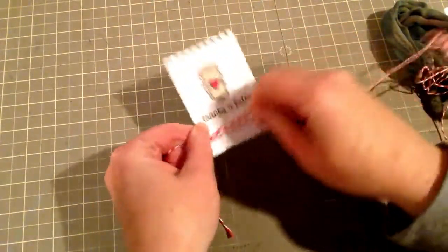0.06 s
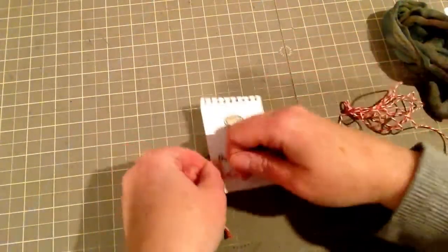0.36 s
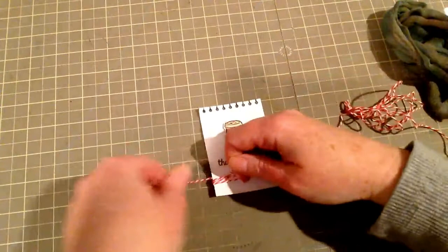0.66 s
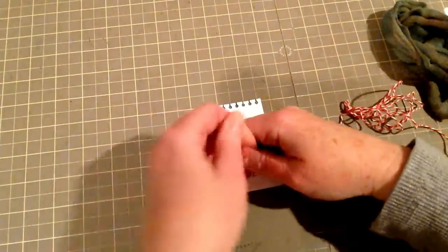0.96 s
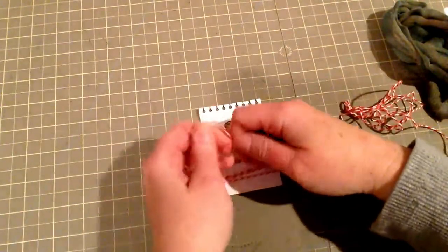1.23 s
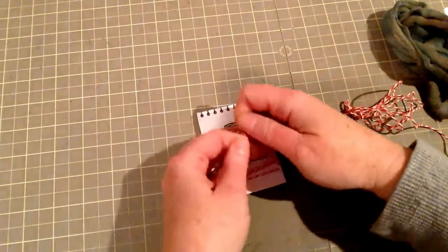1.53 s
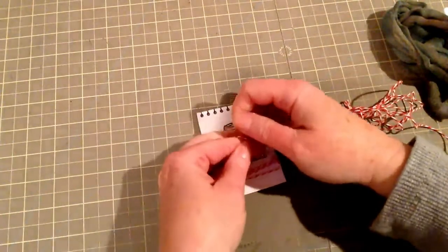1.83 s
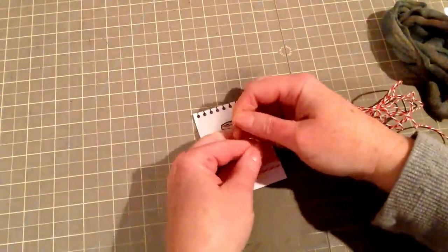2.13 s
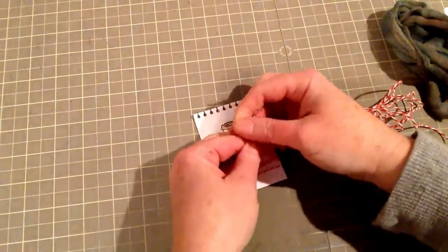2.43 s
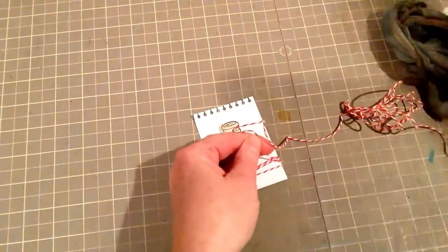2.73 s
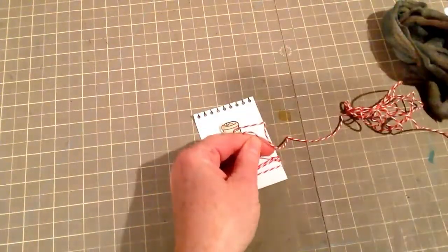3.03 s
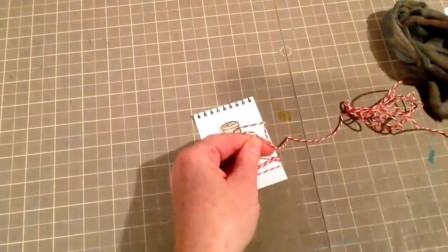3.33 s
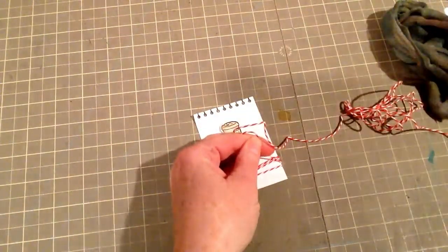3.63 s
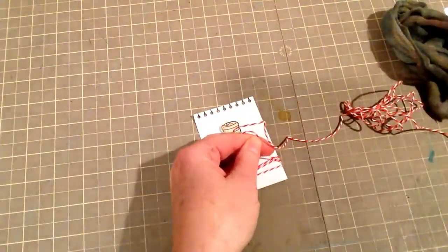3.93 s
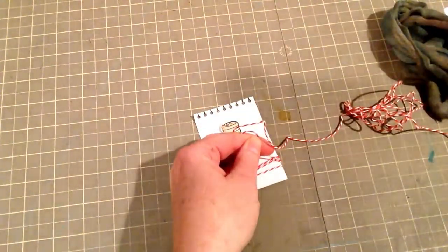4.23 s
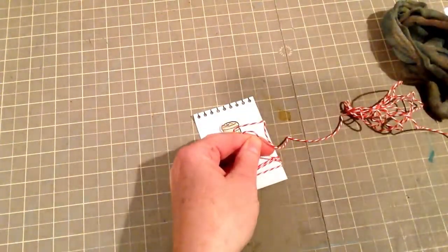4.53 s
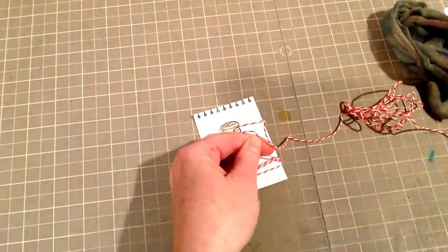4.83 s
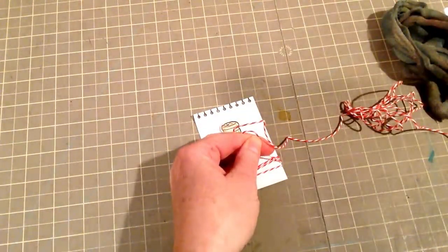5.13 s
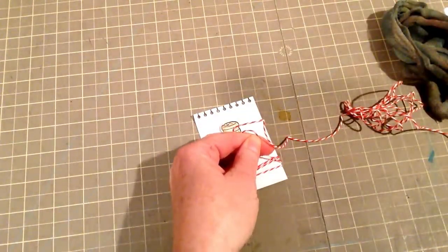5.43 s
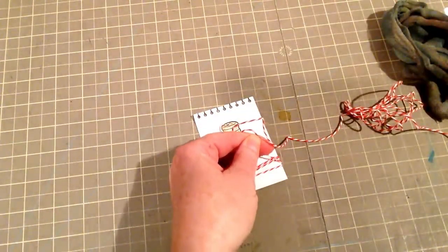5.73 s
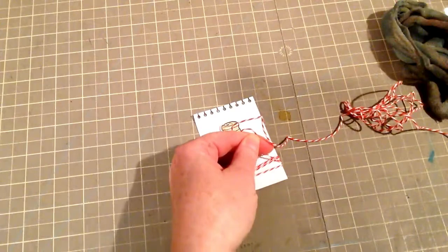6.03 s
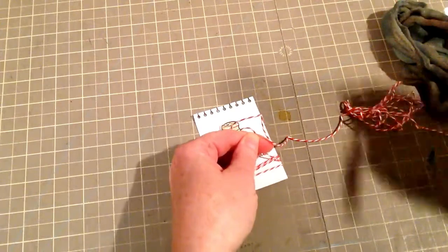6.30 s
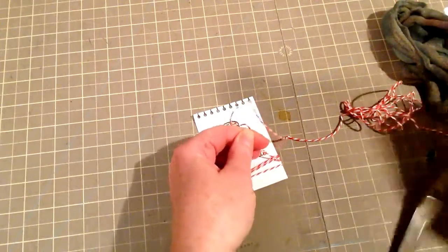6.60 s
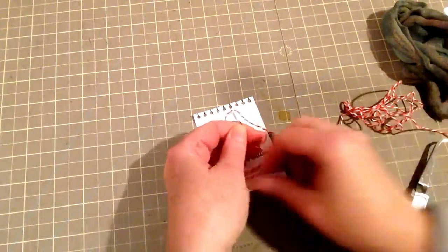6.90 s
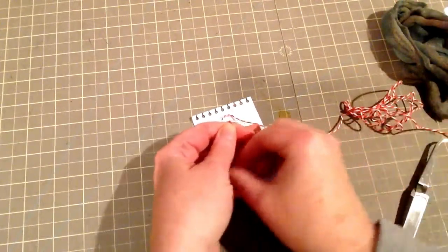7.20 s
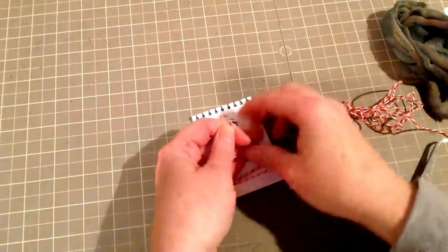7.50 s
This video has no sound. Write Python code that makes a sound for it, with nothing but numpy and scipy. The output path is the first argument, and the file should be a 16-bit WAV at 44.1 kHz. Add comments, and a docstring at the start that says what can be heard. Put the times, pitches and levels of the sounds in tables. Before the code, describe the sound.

Twine swishes faintly around a small paper card, and the card snaps once. Things knock and scrape on the desk, then tools rattle and drag in a hollow holder. Steel scissors are put down with two sharp clacks, the loudest sounds, before fingertips brush twine and paper again. The microphone is close, in a small dry room with a soft steady hiss.

```python
"""Twine swishes round the edge of a small paper card, wound by hand over a cutting mat. The card snaps
once and rings faintly under the taut twine. A sleeve rustles as one hand reaches aside, shifts things on
the desk, rummages in a hollow tool holder and puts scissors down with two steel clacks. Then fingertips
rub twine and paper again and the hand bumps the mat. Rubbing is a stream of tiny slips; knocks ring each
object's modes. One mono microphone, close to the hands, in a small dry room with a steady hiss."""
import sys
import numpy as np
from scipy import signal
from scipy.fft import rfft, irfft, next_fast_len
from scipy.io import wavfile

SR = 44100
rng = np.random.default_rng(int(sys.argv[2]) if len(sys.argv) > 2 else 0)


def pcm_store(signal):
    """Save signal as 16-bit PCM."""
    levels = np.round(np.clip(np.atleast_2d(signal), -1, 1) * 32767)
    wavfile.write(sys.argv[1], SR, levels.astype(np.int16).T)


N = 333416
TIME = np.arange(N) / SR

# Modes of the paper card: pitch_hz, level_db, t60_s
CARD_MODES = [(1617, -3.5, 0.016), (2030, -19.5, 0.0039), (2850, -16, 0.0048), (4140, -6, 0.003)]


def from_db(db):
    """Decibels to gain."""
    return 10 ** (np.asarray(db) / 20)


def rms_one(x):
    """Scale to rms 1."""
    return x / np.sqrt(np.mean(x ** 2) + 1e-20)


def butter(x, hz, kind, order=2):
    """Causal low-, high- or band-pass."""
    return signal.sosfilt(signal.butter(order, hz, kind, fs=SR, output="sos"), x)


def coloured(x, colour):
    """Give a steady sound a spectrum; rms 1."""
    hz, db = np.transpose(colour)
    size = next_fast_len(N)
    bins_hz = np.maximum(np.fft.rfftfreq(size, 1 / SR), 1)
    gain = from_db(np.interp(np.log(bins_hz), np.log(hz), db))
    return rms_one(irfft(rfft(x, size) * gain, size)[:N])


def dying(t, t60):
    """Envelope that falls 60 dB in t60 seconds."""
    return np.exp(-np.log(1000) * t / t60)


def ringing(modes):
    """Damped sines after a touch; where it lands sets their strength and sign, the grip their pitch."""
    t = TIME[:SR // 5]
    chance = rng.standard_normal((len(modes), 3))
    strengths = from_db(2 * chance[:, 0]) * np.sign(chance[:, 1])
    detunes = 1 + .015 * chance[:, 2]
    return sum(strength * from_db(db) * np.sin(2 * np.pi * hz * detune * t) * dying(t, t60)
               for strength, detune, (hz, db, t60) in zip(strengths, detunes, modes))


def friction(slips_per_s, spread_db, smooth, judder_db):
    """Tiny random slips of uneven size over a smooth hiss, under a pressure that wavers; rms 1."""
    slips = (rng.random(N) < slips_per_s / SR) * rng.choice([-1, 1], N)
    sizes = from_db(spread_db * np.minimum(rng.exponential(1, N), 4))
    pressure = rms_one(butter(rng.standard_normal(N), 55, "low"))
    texture = rms_one(slips * sizes) + smooth * rng.standard_normal(N)
    return rms_one(texture * from_db(judder_db * pressure))


def rubbed(slips, modes):
    """Slips keep an object's modes ringing; rms 1."""
    return rms_one(signal.fftconvolve(slips, ringing(modes))[:N])


def strokes(table, attack_s, release_s):
    """Gain of a row of strokes: each takes hold, swells or eases with the pressure, and dies away."""
    power = np.zeros(N)
    for start, length, halfway_db, swell_db in table:
        during = slice(*np.searchsorted(TIME, [start, start + length + release_s]))
        t = TIME[during] - start
        attack = np.clip(t / attack_s, 0, 1)
        hold = from_db(halfway_db + swell_db * (np.clip(t / length, 0, 1) - .5))
        release = dying(np.maximum(t - length, 0), release_s)
        power[during] += (attack * hold * release) ** 2
    return np.sqrt(power)


def blows(table, modes, crack_db, crack_t60, spread, body_db, treble_db, clack_hz):
    """Each blow is a tick, a crack and a ring; harder contact has less body, more treble, a higher clack.
    body_db and treble_db (relative to the clack) and clack_hz hold at hardness 0; the hardest is 1."""
    out = np.zeros(N + SR)
    attack = round(.006 * SR)   # each band's level is set over its first 6 ms
    for start, level_db, hardness in table:
        centre_hz = clack_hz * 2 ** hardness
        shares_db = body_db - 28 * hardness, 0, treble_db + 25.5 * hardness
        ring = ringing(modes)
        crack = rng.standard_normal(len(ring)) * dying(TIME[:len(ring)], crack_t60)
        crack[0] = 6   # the tick of contact
        blow = ring + from_db(crack_db) * crack
        body = butter(blow, [100, 850], "band", order=5)
        clack = butter(blow, [centre_hz / spread, centre_hz * spread], "band", order=3)
        treble = butter(blow, 5000, "high", order=3)
        at = round(start * SR)
        for part, db in zip((body, clack, treble), shares_db):
            out[at:at + len(part)] += from_db(level_db + db) * part / np.sqrt(np.mean(part[:attack] ** 2))
    return out[:N]


def twine(fibres):
    """Twine swishes round the edge of the card; pulled taut, it rasps and the card rings."""
    # Pulls round the edge: start_s, length_s, level_db, swell_db
    pulls = [(.03, 0.061, -50.5, 5), (.11, 0.14, -59, 2), (.205, 0.19, -50, 2.5)]
    # Taut tugs: start_s, length_s, level_db, swell_db
    tugs = [(.93, 0.025, -52, 1), (1.0, 0.484, -66.5, -6)]
    # Spectrum of the swish: freq_hz, level_db
    colour = [(900, -18), (1600, -9), (2150, -3.5), (2650, -4.5), (3100, -5.5), (4200, 1), (5700, -9.5),
              (7400, -8.5), (8000, -7), (8600, -5), (9800, -11.5), (13300, -15), (14200, -40)]
    swish = strokes(pulls, attack_s=0.022, release_s=0.13) * coloured(fibres, colour)
    rasp = strokes(tugs, attack_s=0.023, release_s=0.15) * rubbed(fibres, CARD_MODES)
    return swish + rasp


def card_snaps():
    """The edge of the card flicks: one clear snap and two faint ones."""
    # Flicks: start_s, level_db, hardness
    flicks = [(.576, -51, 0.67), (.793, -22, 0.085), (7.062, -51, 0.82)]
    return blows(flicks, CARD_MODES, crack_db=-8, crack_t60=0.035, spread=1.86,
                 body_db=-14.5, treble_db=-41, clack_hz=1720)


def mat_taps():
    """Light things touch the cutting mat, most with a dull tap."""
    # Touches: start_s, level_db, hardness
    touches = [(.611, -56, 0.52), (1.757, -51, 0.23), (2.03, -53, 0.31), (2.586, -42.5, 0.21),
               (3.1005, -21.5, 0.8), (3.323, -44.5, .03), (3.391, -46.5, 0.12), (3.418, -53.5, 0.14),
               (3.441, -47.5, 0.29), (7.183, -45, 1)]
    # Modes of the mat: pitch_hz, level_db, t60_s
    modes = [(277, -5.5, 0.036), (397, -4, 0.049), (537, -5.5, 0.048), (1380, 0.5, 0.022)]
    taps = blows(touches, modes, crack_db=9.5, crack_t60=0.031, spread=1.84,
                 body_db=14.5, treble_db=-25, clack_hz=1296)
    return butter(taps, 374, "high")   # light things give the mat little bass


def sleeve():
    """Cloth rustles low as the arm moves."""
    # Arm movements: start_s, length_s, level_db, swell_db
    moves = [(.75, 0.93, -67.5, 1.8), (2.15, 1.38, -57.5, -0.47), (5.7, 1.5, -72.5, -2)]
    # Spectrum of the cloth: freq_hz, level_db
    colour = [(80, -22.5), (130, -4.5), (220, -0.5), (400, -8.5), (1500, -31.5), (6000, -66)]
    return strokes(moves, attack_s=0.24, release_s=1.56) * coloured(rng.standard_normal(N), colour)


def fingertips(fibres):
    """Fingertips slip over twine and paper with a bright brushing."""
    # Rubs: start_s, length_s, level_db, swell_db
    rubs = [(.82, 0.17, -62.5, 9), (1.135, 0.027, -59.5, 5), (1.405, 0.037, -55, 5), (1.63, .04, -56, -4),
            (2.91, 0.177, -48, 1.5), (3.375, 0.016, -43.5, 10.5), (7.07, 0.15, -53.5, 2.5),
            (7.26, 0.13, -48, -1), (7.465, 0.11, -42.5, 9.5)]
    # Spectrum of the brushing: freq_hz, level_db
    colour = [(500, -19.5), (1400, -8), (2900, -8), (4000, -0.5), (5800, 1), (8000, -3), (13300, -6),
              (14200, -52)]
    return strokes(rubs, attack_s=0.015, release_s=0.08) * coloured(fibres, colour)


def tool_holder():
    """Tools knock and drag in the holder; the same slips make the grit and excite its hollow ring."""
    # Tools knocking about: start_s, relative_level_db, hardness
    hits = [(2.43, -48, 0.2), (2.466, -21, 0.84), (2.494, -27, 0.69), (4.142, -59, 0.02),
            (4.528, -30.5, 0.84), (4.569, -40, 1), (4.578, -24.5, 1), (4.5875, -25, 0.7),
            (4.6015, -23.5, .85), (4.731, -39, 0), (4.9405, -24.5, 0.31), (5.089, -44, 0.01),
            (5.124, -43, 0.86), (5.132, -47.5, 0.14), (5.144, -45, 0.9), (5.2445, -37.5, 1),
            (5.413, -43.5, 0), (5.475, -35, 0.42)]
    # Drags along the holder's wall: start_s, length_s, relative_level_db, swell_db
    drags = [(2.458, 0.041, -29, 4), (3.76, 0.16, -66.5, -9), (4.517, 0.022, -38, 9),
             (4.572, 0.047, -38, -5), (4.883, 0.021, -46, -2.5), (4.955, 0.046, -35, 3.5),
             (5.09, .1, -50.5, 5.5), (5.2, 0.137, -39.5, 16.5), (5.35, .115, -36.5, -1),
             (5.475, 0.032, -30, -13)]
    # Modes of the holder: pitch_hz, level_db, t60_s
    modes = [(450, -7.5, 0.084), (501.6, 2, 0.039), (609, -3.5, 0.048), (690, 0.5, 0.019),
             (1201, -8.5, 0.023), (1562, -10, 0.036), (2440, -16, 0.0095), (3524, -1.5, 0.0089),
             (4690, -18.5, 0.024), (6050, -10, 0.0097)]
    # Spectrum of the grit: freq_hz, level_db
    colour = [(700, -18), (1100, 2.5), (1600, 0.5), (1900, -2), (2500, 1), (3600, -2), (4800, -9),
              (8000, -11.5), (13000, -18.5), (14500, -57.5)]
    slips = friction(slips_per_s=550, spread_db=3.0, smooth=0.87, judder_db=1.43)
    hollow = rms_one(butter(rubbed(slips, modes), [520, 770], "band", order=3))
    grit = wall_echo(coloured(slips, colour), delay_s=.0012, travel=.12, share=.55)
    scrapes = strokes(drags, attack_s=0.0055, release_s=0.17) * (hollow + grit)
    knocks = blows(hits, modes, crack_db=-3.5, crack_t60=0.039, spread=1.93,
                   body_db=14.5, treble_db=-28, clack_hz=1750)
    knocks = butter(knocks, [390, 13500], "band", order=4)   # no bass, top trimmed above 13.5 kHz
    return from_db(0.5) * scrapes + from_db(3.0) * knocks


def wall_echo(x, delay_s, travel, share):
    """A wall close by reflects the sound; as the tool moves, the delay and the spectral peaks shift."""
    wander = rms_one(butter(rng.standard_normal(N), 5, "low"))
    echo = np.interp(TIME - delay_s * np.exp(travel * wander), TIME, x)
    return rms_one(x + share * echo)


def desk_slides():
    """Things pushed over the desk scrape in dense, fine slips."""
    # Pushes: start_s, length_s, level_db, swell_db
    pushes = [(2.53, 0.082, -41, 1), (2.63, 0.12, -43.5, 7), (2.8, 0.314, -52.5, 11.5),
              (3.11, 0.042, -38, -13), (3.39, 0.12, -54.5, 0), (5.867, 0.01, -44.5, -1)]
    # Spectrum of the scrape: freq_hz, level_db
    colour = [(90, -14.5), (170, -16), (400, -5), (650, -1.5), (1700, -2.5), (3200, -7), (7000, -12.5),
              (9000, -15.5), (13000, -18.5), (14500, -56)]
    slips = friction(slips_per_s=3700, spread_db=4, smooth=0.26, judder_db=0.5)
    return strokes(pushes, attack_s=0.0067, release_s=.2) * coloured(slips, colour)


def scissors():
    """Steel meets the desk, clacks and chatters."""
    # Contacts: start_s, level_db, hardness
    clacks = [(6.032, -16.5, 0.57), (6.16, -10, 0.73), (6.1635, -13.5, 0.98), (6.169, -22.5, 0.9),
              (6.1975, -19.5, 0.67), (6.4565, -46, 0.95)]
    # Modes of the scissors on the desk: pitch_hz, level_db, t60_s
    modes = [(128, -14.5, 0.044), (256, -7, 0.037), (522, -18.5, 0.014), (1284, -6, 0.0064),
             (1865, 4.5, .012), (2175, 2, .012), (2575, 2, 0.017), (3540, 0.5, 0.016), (5770, 0, 0.02),
             (7400, -7.5, .016), (14100, -3, 0.038)]
    return blows(clacks, modes, crack_db=5.5, crack_t60=0.039, spread=2.28,
                 body_db=6.0, treble_db=-23.5, clack_hz=1500)


def hand_thud(start_s, level_db):
    """The side of the hand lands on the mat; soft flesh gives a short, low bump."""
    since = np.maximum(TIME - start_s, 0)
    envelope = np.minimum(since / 0.0032, 1) * dying(since, t60=0.077)
    bump = rms_one(butter(rng.standard_normal(N), [120, 460], "band", order=3))
    return from_db(level_db) * bump * envelope


def room(x, t60_s, treble_t60_s, level_db, gap_s):
    """Dense echoes after a short gap, strongest at first from desk and near wall; treble dies first."""
    t = TIME[:SR // 2]
    echoes = rng.standard_normal(len(t)) * (t > gap_s) * (1 + 1.12 * dying(t, 0.12))
    dull = butter(echoes, 2700, "low", order=1)
    tail = dull * dying(t, t60_s) + 0.54 * (echoes - dull) * dying(t, treble_t60_s)
    return from_db(level_db) * signal.fftconvolve(x, tail / np.linalg.norm(dying(t, t60_s)))[:N]


def scene():
    """All sources over a steady hiss, alike in both channels; the hands are nearest, so driest."""
    # Spectrum of the background hiss: freq_hz, level_db
    hiss_colour = [(80, -10), (128, 8.5), (160, 4.5), (210, 10.5), (400, 5.5), (1000, 0.5), (3000, -1.5),
                   (12600, -2.5), (13400, -56)]
    fibres = friction(slips_per_s=2800, spread_db=3, smooth=1.0, judder_db=0.8)
    hands = twine(fibres) + fingertips(fibres) + sleeve() + card_snaps()
    hands += hand_thud(start_s=7.183, level_db=-37.5)
    desk = tool_holder() + scissors() + mat_taps() + desk_slides()
    hiss = from_db(-58) * coloured(rng.standard_normal(N), hiss_colour)
    echoes = room(desk + from_db(-2) * hands, t60_s=0.3, treble_t60_s=.2, level_db=-8, gap_s=.0065)
    mono = hands + desk + echoes + hiss
    return np.array([mono, mono])


def record(dry):
    """The deep bass is shed, the highest peaks are rounded and the treble ends near 16 kHz."""
    rounded = np.tanh(butter(dry, 120, "high", order=1))
    top_cut = signal.cheby2(18, 90, 16300, fs=SR, output="sos")   # 90 dB down from 16.3 kHz
    return signal.sosfilt(top_cut, rounded)


dry = scene()
out = record(dry)
pcm_store(out)
```